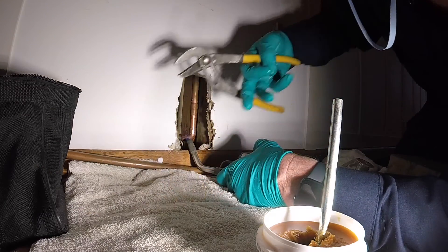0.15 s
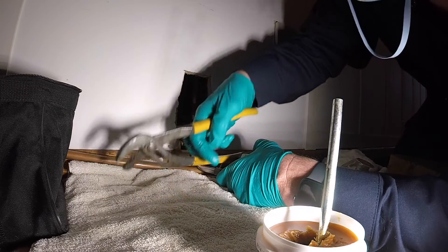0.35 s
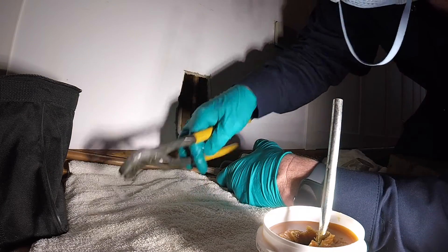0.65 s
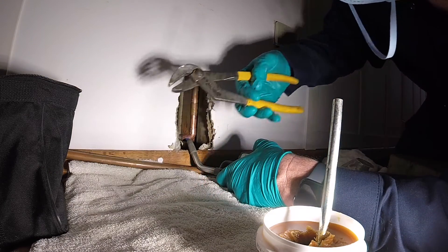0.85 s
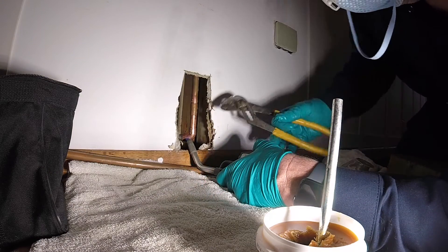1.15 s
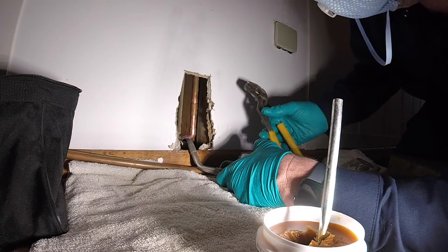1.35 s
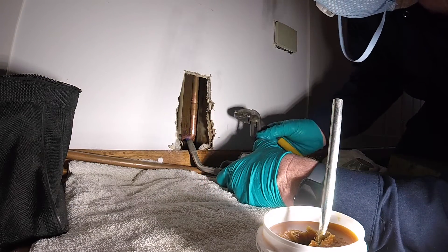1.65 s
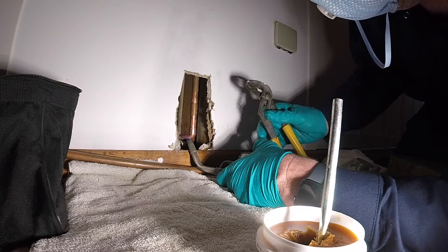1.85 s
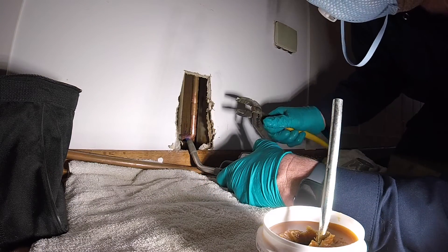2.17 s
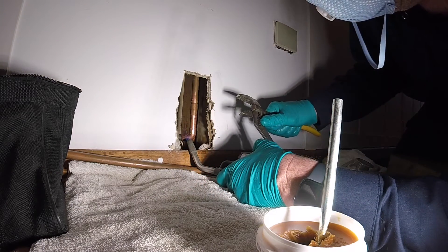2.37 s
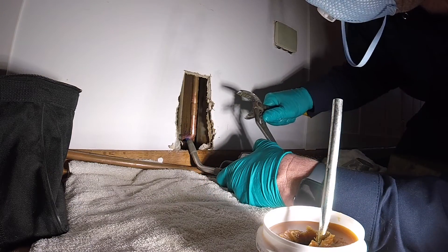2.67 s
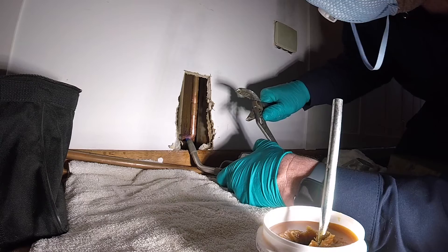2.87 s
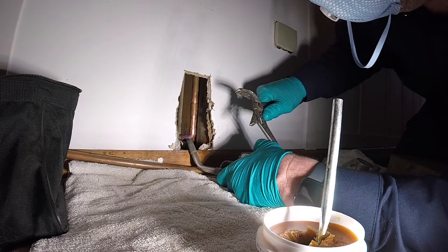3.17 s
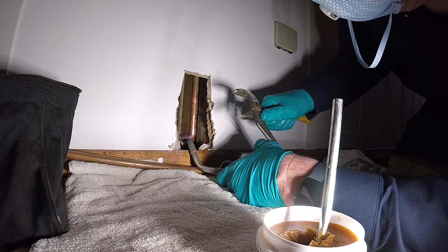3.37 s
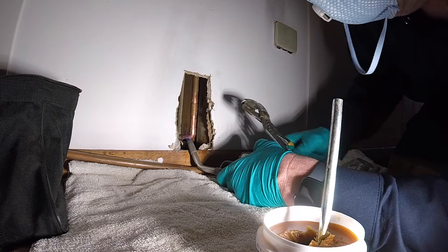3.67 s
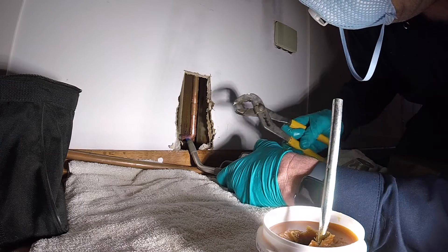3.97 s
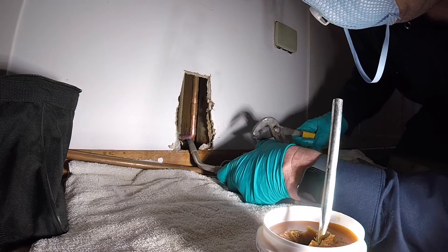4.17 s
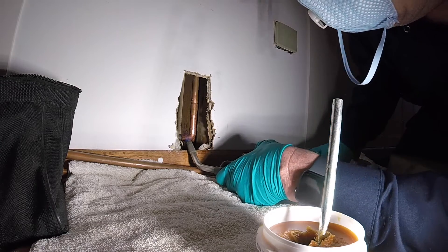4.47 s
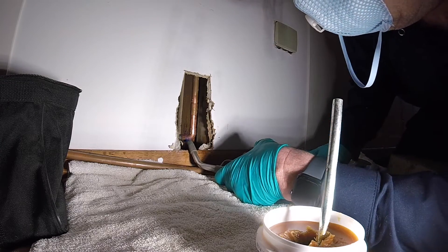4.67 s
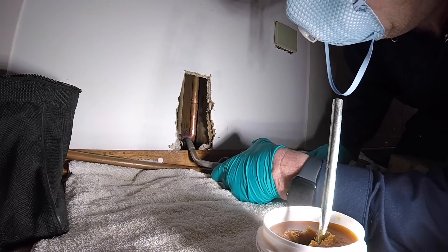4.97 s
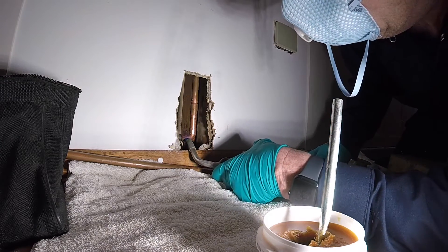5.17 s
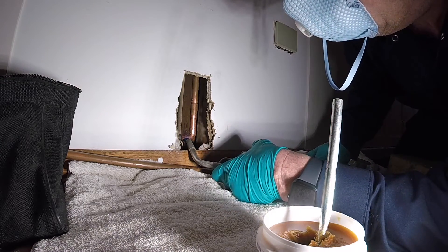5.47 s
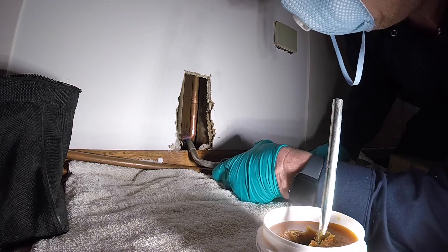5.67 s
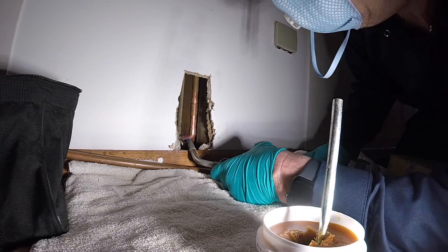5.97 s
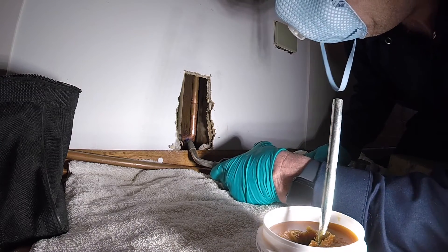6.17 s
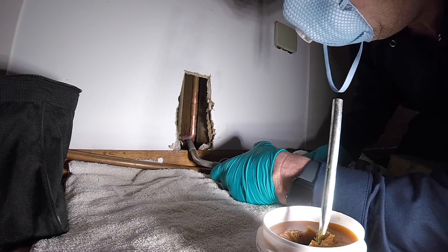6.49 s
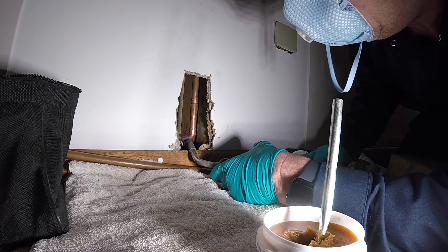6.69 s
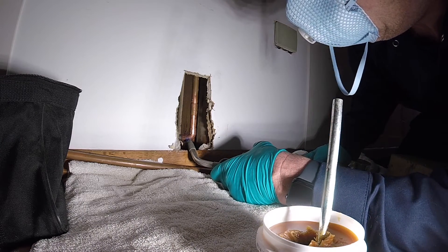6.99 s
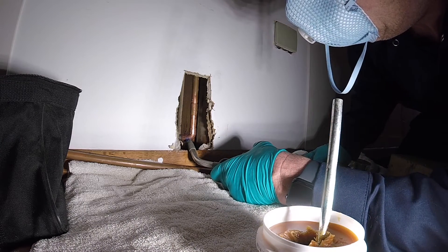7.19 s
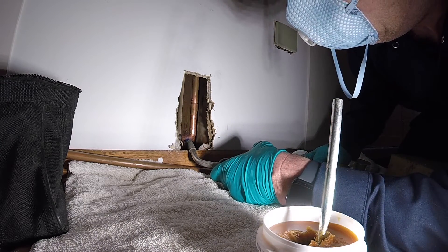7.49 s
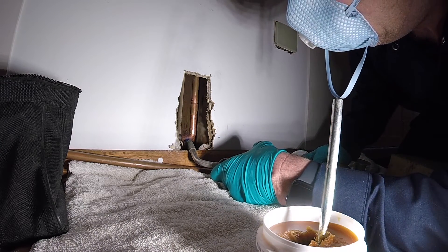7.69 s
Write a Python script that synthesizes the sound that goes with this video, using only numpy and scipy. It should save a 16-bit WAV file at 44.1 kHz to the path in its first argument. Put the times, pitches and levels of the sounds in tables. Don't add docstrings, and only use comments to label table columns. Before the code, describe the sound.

Steady wet-vacuum suction at an opened wall, heard close in mono: low roar, mid-pitched unsteady whine, rough hiss with slight watery flutter. A sharp plier snap cuts through near the start, followed by padded thuds, a very faint metal tick and another low knock. After the midpoint the machine continues alone, slightly darker and less whiny, its colour shifting subtly with body movement.

```python
import sys
import numpy as np
from scipy import signal
from scipy.fft import rfft, irfft, next_fast_len
from scipy.io import wavfile
from scipy.ndimage import uniform_filter1d, map_coordinates

SR = 44100
rng = np.random.default_rng(int(sys.argv[2]) if len(sys.argv) > 2 else 0)


def elevation(decibels):
    levels = np.asarray(decibels, float)
    return 10 ** (levels / 20)


def transcribe(signal):
    frames = np.atleast_2d(signal).T
    limited = np.clip(frames, -1, 1)
    pcm = np.round(limited * 32767).astype(np.int16)
    wavfile.write(sys.argv[1], SR, pcm)


N = 345744

# time in seconds, leaning in 0-1, arm across 0-1.
POSTURE = [(0, 0, .1), (.22, 0, .15), (.32, 0, .55), (.44, 0, .5), (.47, 0, 1), (.58, 0, 1), (.65, 0, .6),
           (.78, 0, .3), (1.1, 0, 0), (4.45, 0, 0), (4.7, .3, 0), (4.84, 1, 0), (7.84, 1, 0)]
# time in seconds, tool hand near the wall, hand withdrawing, head turned.
SMALL_MOVES = [(0, 0, 0, 0), (.9, 0, 0, 0), (1.15, .55, 0, 0), (2.3, .55, 0, 0), (2.7, -.45, 0, 0),
               (4.3, -.45, 0, 0), (4.45, -.45, .8, 0), (4.65, -.45, .8, 0), (4.85, 0, 0, .62),
               (5.85, 0, 0, .62), (6.1, 0, 0, -.38), (7.84, 0, 0, -.38)]

# frequency in Hz, level in dB per Hz.
AIR_SPECTRUM = [(70, -47.5), (118, -37.5), (153, -2.5), (420, -10.1), (580, -29.7), (900, -7.6),
                (1250, -25.4), (2400, -25.9), (4200, -34), (5500, -23.8), (7100, -39.5), (10500, -48.9),
                (11800, -59.6), (15000, -63.8)]
# centre in Hz, width in Hz, gain in dB.
TANK_AND_HOSE = [(130, 47, -1.4), (163, 13, 3.0), (176, 16, 2.9), (209, 28, -3.8), (269, 79, 2.0),
                 (303, 12, -2.6), (329, 38, -3.3), (366, 20, 2.3), (422, 9, -2.6), (547, 49, 5.6),
                 (575, 25, -8.5), (598, 25, 4.9), (613, 25, 2.6), (644, 54, -4.4), (730, 52, -3.2),
                 (790, 30, 1.5), (832, 29, -2.6), (965, 25, -1.5), (869, 43, 1.8), (929, 32, 2.8),
                 (992, 74, -3.7), (1051, 77, 7.0), (1118, 20, 1.4), (1161, 46, -4.6)]
# centre in Hz, width in Hz, gain in dB.
WALL_CAVITY = [(1231, 26, -14.0), (1234, 36, 9.0), (1293, 22, -5.3), (1318, 25, 2.3), (1363, 28, -4.4),
               (1391, 37, 7.4), (1398, 45, -9.8), (1450, 61, -3.5), (1486, 39, 8.5), (1553, 20, 2.7),
               (1583, 41, -3.5), (1612, 31, 5.2), (1689, 12, -3.0), (1738, 40, 2.7), (1765, 16, -3.3),
               (1818, 15, 2.6), (1840, 19, -5.0), (1891, 36, 7.4), (1973, 36, 3.3), (2016, 48, -3.4),
               (2054, 47, 4.8), (2087, 22, -4.8), (2116, 40, 2.8), (2143, 50, -2.4), (2215, 29, 3.0),
               (2289, 94, 5.5), (2461, 98, -3.2), (2574, 53, 5.5), (2593, 128, -10.0), (2688, 34, -3.5)]
# centre in Hz, width in Hz, gain in dB.
WALL_REFLECTIONS = [(2815, 113, 6.0), (2985, 80, -3.4), (3081, 98, 4.5), (3288, 60, -6.0), (3491, 86, -2.0),
                    (3847, 74, -4.4), (4179, 101, 4.3), (4459, 83, -2.8), (4772, 172, 4.0),
                    (5078, 114, 3.3), (5343, 138, -2.8), (5727, 237, -4.9), (6080, 66, 2.2),
                    (6218, 209, 4.5), (6503, 180, 3.6), (6852, 65, -2.1), (7386, 384, -5.8),
                    (7402, 202, 8.3), (8346, 223, 14.1), (8349, 329, -12.7), (8795, 83, -2.9),
                    (9092, 242, 4.1), (9333, 246, 3.6), (9493, 252, -5.4), (9916, 220, 3.6),
                    (10264, 118, 2.9), (11266, 1036, -1.4), (13548, 1377, 2.6), (14106, 321, 2.5),
                    (14547, 1523, -3.1)]

PART_EDGES_HZ = [0, 580, 1250, 4300, 20000]
# level upright in dB, change leaning in in dB, change arm across in dB.
PART_LEVELS = [
    (-26.5, 0.46, 0),
    (-27.5, -3, -3.5),
    (-36, -1.5, 0),
    (-38.5, -0.5, -4.5),
]

# centre in Hz, width in Hz, gain in dB.
TORSO = [(374, 19, 0.9), (488, 130, 1.5), (632, 124, -2.3), (785, 135, -0.8), (960, 71, -7.9),
         (962, 31, 5.7), (1072, 33, -2.6), (1135, 229, 2.2), (1224, 40, 0.6), (1257, 44, -2.4),
         (1363, 14, 1.0), (1414, 20, -2.5), (1478, 21, -1.4), (1675, 164, -2.5), (1778, 44, 1.6),
         (1808, 45, -2.6), (1998, 133, 1.5), (2022, 36, -3.3), (2143, 50, 2.8), (2160, 50, -2.4),
         (2361, 371, -2.1), (2413, 23, 0.9), (2510, 56, -2.4), (2594, 38, 2.5), (2613, 42, 2.3),
         (2645, 42, -2.4), (2697, 40, -3.1)]
# centre in Hz, width in Hz, gain in dB.
HEAD = [(2731, 46, -2.0), (2899, 97, 1.8), (3148, 81, 2.2), (3290, 46, -4.2), (3341, 81, -2.1),
        (3493, 224, 3.2), (3607, 120, -4.0), (3797, 143, -1.0), (4397, 65, -1.8), (4838, 182, -2.3),
        (5029, 125, 1.2), (5156, 179, 2.5), (5331, 132, -2.8), (5689, 192, 1.9), (6054, 157, -2.6),
        (6437, 118, -3.0), (6926, 96, -2.2), (7328, 114, 2.0), (7600, 258, -1.9), (7762, 140, 4.1),
        (8713, 155, -2.4), (8938, 144, 1.6), (9253, 142, 1.5), (9543, 168, -3.0), (9856, 645, 4.1),
        (10149, 87, -1.8), (10730, 170, 1.5), (10889, 190, -1.9), (12071, 890, 0.5), (14053, 440, 2.2)]
# centre in Hz, width in Hz, gain in dB.
ARM_SHADE = [(927, 67, -5.8), (1333, 290, 1.8), (1620, 43, -6.4), (1836, 142, 4.9), (2136, 67, 4.3),
             (2429, 350, -3.9), (2780, 200, -3.5), (2985, 94, 4.2), (3326, 93, -5.7), (3507, 129, 5.4),
             (3662, 590, 4.5), (5394, 282, -4.0), (5712, 183, 4.1), (6100, 900, -2), (6561, 4040, -4.5),
             (7375, 596, 3.4), (9072, 191, -2.3), (10295, 1013, -1.5)]
# centre in Hz, width in Hz, gain in dB.
HAND_NEAR = [(1248, 150, -1.3), (2540, 90, -1.4), (3273, 250, -1.6), (3531, 90, 1.2), (3962, 90, 2.7),
             (4177, 90, -1.5), (5124, 90, -2.4), (5340, 90, 1.2), (5641, 150, -2.4), (5857, 150, 1.1),
             (6632, 150, -2.3), (6890, 90, 2.2), (7192, 250, 1.8), (7536, 90, -1.4), (7708, 90, -2.4),
             (8570, 250, 3.6), (8785, 90, -1.9), (9043, 150, 2.9), (9603, 90, -2.4), (10335, 90, 2.0),
             (10637, 150, -2.0), (11068, 90, -1.8), (11197, 90, 1.6), (11584, 150, -1.1)]
# centre in Hz, width in Hz, gain in dB.
HAND_WITHDRAWN = [(2411, 250, -3.2), (4005, 90, -5.1), (5297, 250, -3.9), (5727, 90, 5.6), (6459, 90, -3.7),
                  (6933, 90, -5.9), (8613, 90, -4.9), (9689, 150, 2.8), (10465, 900, -1.8),
                  (11972, 450, -2.1)]
# centre in Hz, width in Hz, gain in dB.
HEAD_TURNED = [(861, 90, -2.3), (1378, 250, 2.2), (2497, 250, 2.1), (2756, 90, -3.3), (3014, 250, -4.0),
               (3359, 90, 4.5), (4048, 90, -2.8), (4306, 150, 1.6), (4780, 90, -1.7), (5340, 150, 2.8),
               (5641, 90, -4.0), (5857, 150, -1.7), (6158, 90, 2.4), (6847, 150, -2.3), (7407, 250, 1.9),
               (7924, 90, 3.0), (8139, 90, -2.5), (8699, 90, 1.8), (8871, 90, -2.8), (9130, 150, -3.6),
               (9689, 150, -5.0), (10163, 90, 3.4), (10723, 150, -2.6), (11240, 450, 1.7)]

# start in seconds, peak in dB, T60 in seconds, tilt in dB per octave.
JAW_SNAPS = [
    (.2306, -14, .018, -2.6),
    (.2360, -18, .022, 0),
    (.2398, -16.5, .018, 0),
    (.2428, -30, .012, 0),
    (.24, -32, .13, -2.2),
]
# start in seconds, peak in dB, T60 in seconds, tilt in dB per octave.
PIVOT_TICKS = [
    (1.9203, -39, .02, -1),
    (1.9224, -39, .022, .6),
    (1.9245, -46, .2, .5),
    (1.9355, -43, .012, .5),
]
# frequency in Hz, level in dB.
STEEL_SPECTRUM = [(700, 3), (1500, 2), (2100, -2), (2450, 2), (3300, -4), (3900, -1), (4500, -4), (5200, 2),
                  (6000, -1), (7000, -2), (8200, -9), (10000, -4.5), (12000, -24), (14000, -21),
                  (15200, -30)]
# frequency in Hz, level in dB.
PIVOT_SPECTRUM = [(5500, -20), (6700, -3), (7200, 3), (7700, -8), (8400, 1), (8750, -2), (9100, 2),
                  (9700, -20), (10300, -12), (10900, -20), (11400, -15), (12000, -24), (15000, -28)]
# frequency in Hz, peak in dB, T60 in seconds.
HANDLE_RINGS = [(1130, -29, .08), (1400, -31, .06), (2433, -22, .05), (2820, -23, .045), (3750, -28, .04),
                (4870, -29, .05), (5135, -23, .04), (5475, -28, .05), (6412, -30, .05), (9950, -29, .025)]
# start in seconds, peak in dB, frequency in Hz, T60 in seconds.
KNOCKS = [(.231, -5.5, 265, .065), (.235, -15, 330, .06), (.238, -14, 320, .05), (.2305, -15, 460, .06),
          (.2415, -16, 168, .45), (.272, -17, 295, .09), (.252, -20, 240, .2), (.231, -22, 620, .05),
          (.2305, -17, 780, .025), (.2306, -24, 2330, .03), (.2306, -23, 4900, .02),
          (.2306, -24, 6100, .02), (.482, -13, 370, .05), (.484, -21, 300, .1), (.581, -18, 215, .05),
          (3.549, -17, 270, .07), (3.549, -32, 610, .05), (3.55, -31, 500, .05), (3.552, -25, 380, .06),
          (1.9203, -32, 7180, .02), (1.9224, -35, 8380, .018), (1.9224, -34, 9100, .016),
          (5.512, -43, 7350, .08)]


def unit(x):
    return x / np.sqrt(np.mean(x ** 2) + 1e-20)


def along(points, hz):
    point_hz, values = np.transpose(points)
    return np.interp(np.log(hz + 1), np.log(point_hz + 1), values)


def curves(rows):
    time_s, *columns = np.transpose(rows)
    return [np.interp(np.arange(N) / SR, time_s, column) for column in columns]


def wobble(rate_hz):
    knots = rng.standard_normal(int(N * rate_hz / SR) + 4)
    return map_coordinates(knots, [np.arange(N) * rate_hz / SR])


def filtered(x, response):
    size = next_fast_len(x.shape[-1] + 8192)
    spectrum = rfft(x, size) * response(np.fft.rfftfreq(size, 1 / SR))
    return irfft(spectrum, size)[..., :x.shape[-1]]


def bells(modes, hz):
    return sum(db / (1 + (2 * (hz - centre_hz) / width_hz) ** 2) for centre_hz, width_hz, db in modes)


def ripple(hz, depth_db, width_hz):
    knots = map_coordinates(rng.standard_normal(2000), [hz / width_hz], mode="wrap")
    return depth_db * knots * np.clip(hz / 1500 - 1.5, 0, 1)


def bump():
    t = np.clip(np.arange(N) / SR - 5.93, 0, None)
    return elevation(-50 - 60 * t / .4) * np.sin(2 * np.pi * 45 * t) * (1 - np.exp(-t / .03))


def pliers():
    out = np.zeros(N + SR)
    t = np.arange(SR // 4) / SR

    def add(start_s, sound):
        out[round(start_s * SR):][:len(t)] += sound

    for contacts, colour in ((JAW_SNAPS, STEEL_SPECTRUM), (PIVOT_TICKS, PIVOT_SPECTRUM)):
        for start_s, db, t60_s, tilt_db in contacts:
            def steel(hz):
                tilted_db = along(colour, hz) + 2 * tilt_db * np.log2(hz / 4000 + 1)
                return elevation(tilted_db) * (hz > 500)
            burst = unit(filtered(rng.standard_normal(len(t)), steel))
            add(start_s, elevation(db - 60 * t / t60_s) * (1 - np.exp(-t / .0005)) * burst)

    for hz, db, t60_s in HANDLE_RINGS:
        ring = elevation(db - 60 * t / t60_s) * np.sin(2 * np.pi * hz * t)
        add(JAW_SNAPS[1][0], ring * (1 - np.exp(-t / .0025)))

    for start_s, db, hz, t60_s in KNOCKS:
        ring = elevation(db - 60 * t / t60_s) * np.sin(2 * np.pi * hz * t)
        add(start_s, -ring * (1 - np.exp(-t * hz * 3)))
    return filtered(out[:N], lambda hz: hz ** 6 / (120 ** 6 + hz ** 6))


def whine():
    leaning, arm = curves(POSTURE)
    hz = 920 - 25 * leaning - 20 * arm
    turns = np.cumsum(hz + 9 * wobble(11) + 13 * wobble(40)) / SR
    level_db = -30.3 - 6.5 * leaning - 4 * arm + 1.1 * wobble(18)
    return elevation(level_db) * np.sin(2 * np.pi * turns)


def vacuum():
    leaning, arm = curves(POSTURE)
    eddies = rng.standard_normal(N)
    flutter, slugs = wobble(90), wobble(9)
    flutter = flutter - uniform_filter1d(flutter, SR // 22)

    fixed_modes = TANK_AND_HOSE + WALL_CAVITY + WALL_REFLECTIONS
    duct = filtered(eddies, lambda hz: elevation(along(AIR_SPECTRUM, hz) + 1.15 * bells(fixed_modes, hz)))

    def path(body_db):
        return filtered(duct, lambda hz: elevation(body_db(hz) + ripple(hz, depth_db=1.83, width_hz=25)))

    upright = path(lambda hz: -bells(TORSO + HEAD, hz))
    leaned = path(lambda hz: bells(TORSO, hz) + 1.25 * bells(HEAD, hz))
    shaded = path(lambda hz: bells(ARM_SHADE, hz) - bells(TORSO + HEAD, hz))

    total = np.zeros(N)
    depths_db = [(.1, .3), (.2, .4), (.7, .3), (1.1, .15)]
    bands = zip(PART_EDGES_HZ, PART_EDGES_HZ[1:], PART_LEVELS, depths_db)
    for low_hz, high_hz, (db, lean_db, arm_db), (flutter_db, slug_db) in bands:
        def part(x):
            return unit(filtered(x, lambda hz: (hz >= low_hz) & (hz < high_hz)))
        air = (1 - leaning - arm) * part(upright) + leaning * part(leaned) + arm * part(shaded)
        level_db = db + lean_db * leaning + arm_db * arm + flutter_db * flutter + slug_db * slugs
        total += elevation(level_db) * air
    return total


def swayed(x):
    hz, t, z = signal.stft(x, SR, nperseg=1024)
    time_s, *moves = np.transpose(SMALL_MOVES)
    shift_db = np.outer(bells([(5140, 160, 3)], hz), np.exp(-((t - 5.22) / .2) ** 2))
    for modes, move in zip((HAND_NEAR, HAND_WITHDRAWN, HEAD_TURNED), moves):
        shift_db = shift_db + np.outer(bells(modes, hz), np.interp(t, time_s, move))
    return signal.istft(z * elevation(shift_db), SR, nperseg=1024)[1][:N]


def gated(x):
    gate_hz, gate_db, kept_db = 14700, -.6, 1.2
    hz, t, z = signal.stft(x, SR, nperseg=1024, noverlap=768)
    power = uniform_filter1d(np.abs(z) ** 2, size=3, axis=1)
    power = uniform_filter1d(power, size=4, axis=2)
    usual = np.median(power[:, np.abs(hz - gate_hz) < 200])
    kept_gain = elevation(kept_db * np.clip(hz[:, None] / 1500 - 8.7, 0, 1))
    gain = np.where(power > usual * elevation(2 * gate_db), kept_gain, 0)
    gain = np.where(hz[:, None] > 12000, gain, 1)
    return signal.istft(z * gain, SR, nperseg=1024, noverlap=768)[1][:, :N]


def scene():
    return (swayed(vacuum() + whine()) + pliers() + bump())[None]


def band_limit(x):
    return signal.sosfilt(signal.butter(12, 15270, fs=SR, output="sos"), x)


def record(dry):
    soft = filtered(dry, lambda hz: 1 / (1 + (hz / 15230) ** 200))
    return band_limit(gated(soft))


dry = scene()
out = record(dry)
transcribe(out)
```